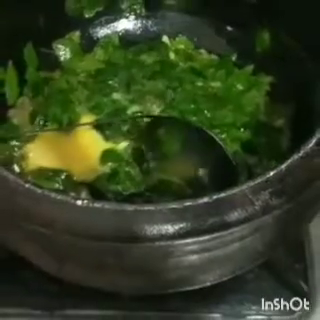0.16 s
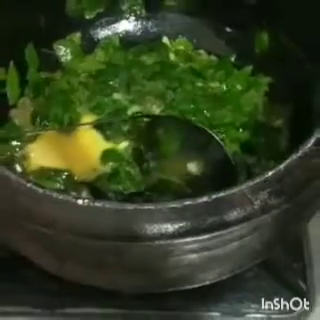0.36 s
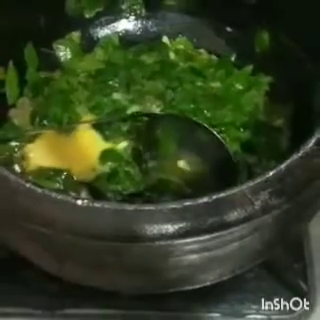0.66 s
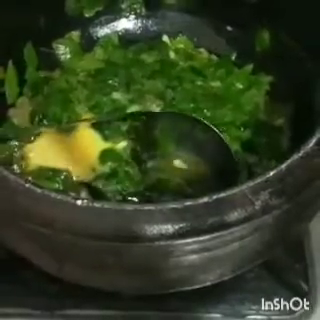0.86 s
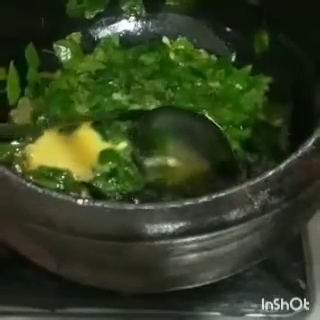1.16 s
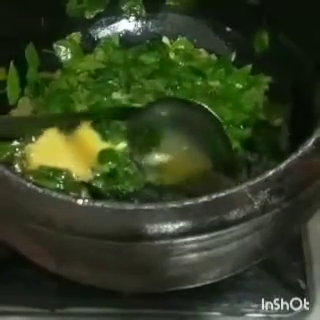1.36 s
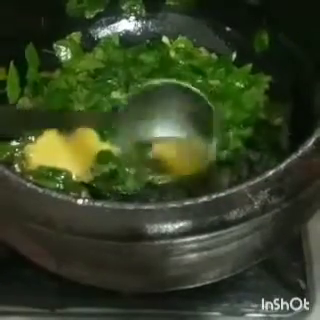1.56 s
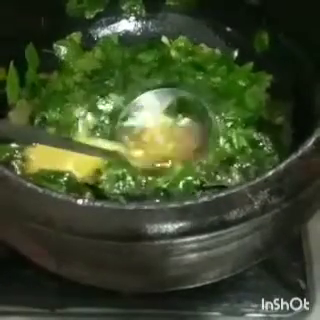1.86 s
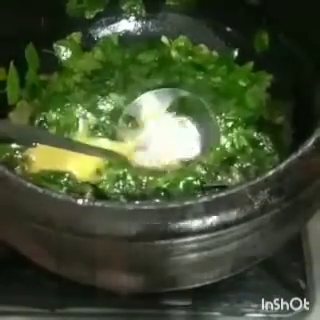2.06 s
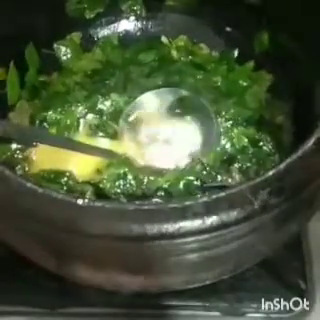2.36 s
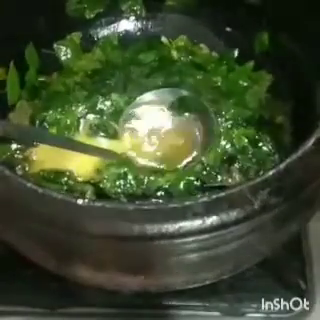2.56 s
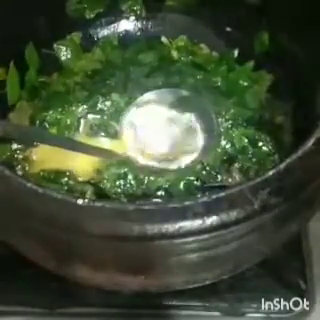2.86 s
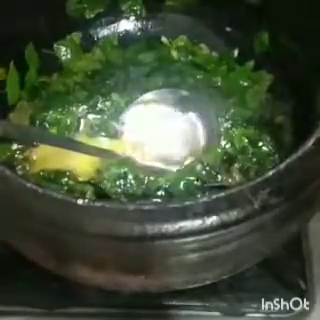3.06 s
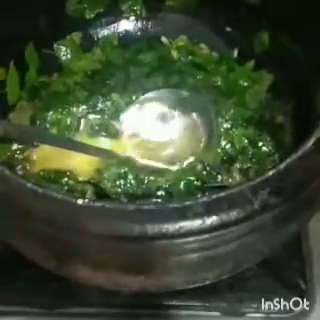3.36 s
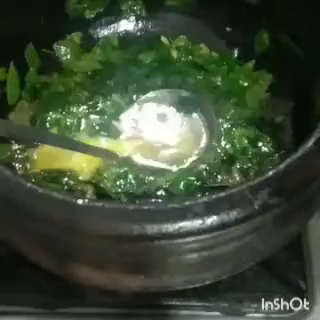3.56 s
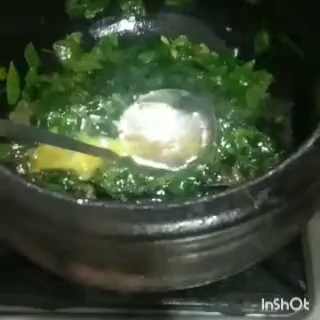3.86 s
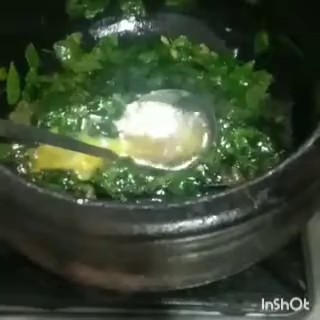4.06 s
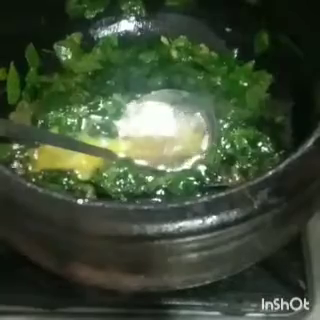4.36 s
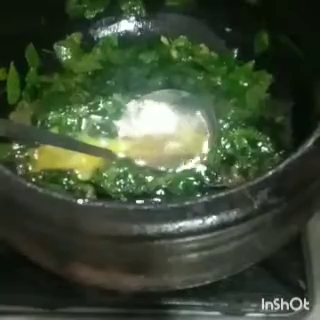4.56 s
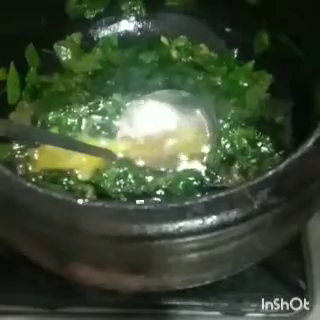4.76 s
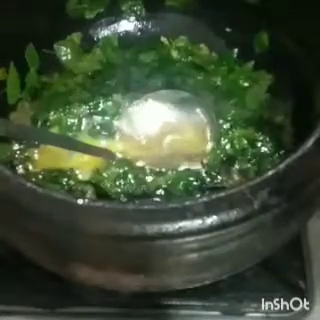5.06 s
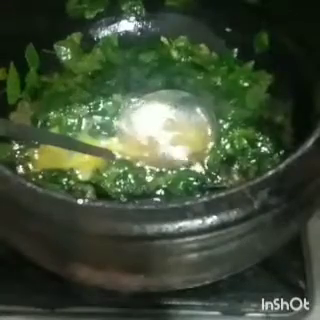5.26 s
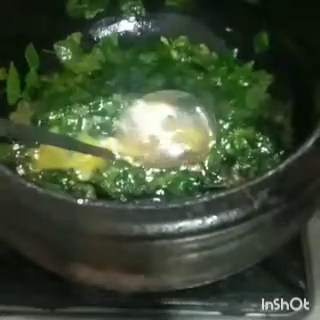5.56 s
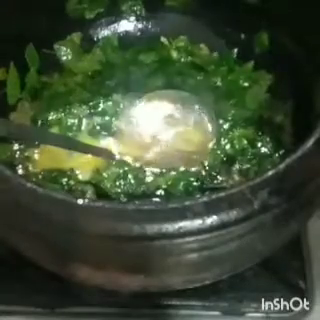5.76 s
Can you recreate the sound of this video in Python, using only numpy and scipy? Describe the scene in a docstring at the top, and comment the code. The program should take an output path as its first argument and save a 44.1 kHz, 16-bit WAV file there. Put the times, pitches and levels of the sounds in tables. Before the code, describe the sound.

Leaves simmer in a clay pot close to the microphone, giving a soft, steady fizz of tiny bubbles for the whole six seconds, with occasional quiet plops. Short wet spits crackle often in the first two seconds, thickest from about 1.6 to 2.1 seconds, then come only now and then. From about 2.3 seconds, utensils knock lightly across the kitchen. At 2.6 seconds a metal ladle is tapped sharply and rings briefly, followed by two weaker taps. Between 3.6 and 3.9 seconds a vessel is set down and rocks, making a quick, prominent ringing rattle. More utensil clacks and thuds on the counter come from 4.4 to 5.5 seconds, strongest near 4.6, 5.2 and 5.5. The walls give each blow a short echo. A faint, very deep rumble swells at about 4.5 seconds and dies away beneath the simmering.

```python
"""In a kitchen, leaves simmer in a clay pot close by: tiny bubbles burst in a steady fizz, with soft plops
and louder spits, coloured by the pot and the microphone. Across the room utensils knock, a metal ladle is
tapped, and a vessel is set down and rocks. The walls draw each blow out into a short tail of echoes.
Near the end a very deep rumble swells and dies away."""
import sys
import numpy as np
from scipy import signal
from scipy.fft import rfft, irfft
from scipy.io import wavfile
from scipy.ndimage import uniform_filter1d

SR = 44100
rng = np.random.default_rng(int(sys.argv[2]) if len(sys.argv) > 2 else 0)


def waveform_to_disk(signal):
    """Save audio, clipped to [-1, 1], as 16-bit WAV at the path in sys.argv[1]."""
    frames = np.transpose(np.atleast_2d(signal))
    scaled = np.clip(frames, -1, 1) * 32767
    samples = np.round(scaled).astype(np.int16)
    wavfile.write(sys.argv[1], SR, samples)


N = 260631
T = np.arange(N) / SR  # time in seconds
TAIL_SAMPLES = int(0.5 * SR)  # length of one blow's ring
CLACK, THUD, BODY, TICK = range(4)  # the four pitch ranges of a blow


def undb(db):
    return 10 ** (np.asarray(db) / 20)


def unit(x):
    return x / np.sqrt(np.mean(x ** 2))


def peak(x):
    return x / np.abs(x).max()


def band(x, low_hz, high_hz):
    return signal.sosfilt(signal.butter(3, [low_hz, high_hz], "bandpass", fs=SR, output="sos"), x)


def fade(fade_s, size=TAIL_SAMPLES):
    """A smooth decay that drops 60 dB in fade_s seconds."""
    return np.exp(-np.log(1000) * T[:size] / fade_s)


def through(x, response):
    return signal.fftconvolve(x, response)[:N]


def add(out, start_s, sound):
    i = int(start_s * SR)
    out[i:i + len(sound)] += sound[:len(out) - i]


def tone_filter(db_at_hz, size=4096):
    """A filter with the given gain at each pitch; it rings only after a sound, never before."""
    hz = np.maximum(np.arange(size // 2 + 1) * SR / size, 10)
    cepstrum = irfft(db_at_hz(hz) * np.log(10) / 20)
    cepstrum[1:size // 2] *= 2
    cepstrum[size // 2 + 1:] = 0
    return irfft(np.exp(rfft(cepstrum)))


def wander(steps_per_s):
    """A value that drifts smoothly from one random level to the next."""
    hold = int(SR / steps_per_s)
    steps = np.repeat(rng.standard_normal(N // hold + 1), hold)
    return 1.3 * uniform_filter1d(uniform_filter1d(steps, hold), hold)[:N]


def pot_and_microphone_db(hz):
    """The pot's resonance and the microphone together lift some pitches and weaken others."""
    # peaks and dips: pitch_hz, width_hz, gain_db
    bumps = [(56.3, 16, -29.5), (262, 28, -12.5), (747.6, 270, 15), (1260, 400, -7), (1434, 120, 1.5),
             (2100, 105, 7), (2770, 23, 2), (3447, 360, 5), (3940, 355, -6.5), (6917, 900, 12.5),
             (8190, 200, 8), (11100, 5070, -10), (15500, 620, 17)]
    return sum(db / (1 + (2 * (hz - centre) / width) ** 2) for centre, width, db in bumps)


def fizz():
    """Bubbles of each size burst at random over a smooth hiss; all surge as the boil wavers."""
    # course of the simmer: time_s, level_db, murmur_boost_db, treble_boost_db
    simmer = [(0.0, -54.5, 5, 0), (0.45, -56.5, 4, 1), (1.42, -55, 4.5, 0.5), (1.75, -53, 2, 1),
              (2.05, -56.5, 1, 4), (2.25, -56, 1.5, 1), (2.76, -53.5, -2.5, -0.5), (3.33, -58, 0.5, -1),
              (5.9, -57, 3, 0)]
    # tone of the fizz: pitch_hz, gain_db
    spectrum = [(15, -11.5), (25, 1.5), (154, -14.5), (280, -21.5), (706, -10), (1150, -16), (1430, -7),
                (2090, -13.5), (2460, -14), (3410, -15), (4020, -17.5), (6920, -20), (10100, -21),
                (15200, -17), (16500, -48.5)]
    # borders between bubble sizes, large to small: pitch_hz
    edges = [15, 90, 500, 1150, 2600, 4100, 5900, 9000, 13000, 20000]
    bubbles_per_s, spread_db = 500, 8.5  # for each size
    times, level_db, murmur_db, treble_db = np.transpose(simmer)
    pitch_hz, gain_db = np.transpose(spectrum)
    colour = tone_filter(lambda hz: np.interp(np.log(hz), np.log(pitch_hz), gain_db))
    bubbles, surge = 0, wander(12)
    for low_hz, high_hz in zip(edges, edges[1:]):
        strength = undb(spread_db * np.minimum(rng.exponential(size=N), 4.5))
        bursts = through((rng.random(N) < bubbles_per_s / SR) * strength, fade(0.0096, 600))
        flicker = undb(0.83 * surge + 1.57 * wander(22.223))
        loudness = (unit(bursts) + 2.35) * flicker  # the constant is the smooth hiss
        bubbles = bubbles + band(loudness * rng.standard_normal(N), low_hz, high_hz)
    sound = through(bubbles, colour)
    sound /= np.sqrt(np.mean(band(sound, 930, 8900) ** 2))
    murmur = band(sound, 494, 835) * (undb(np.interp(T, times, murmur_db)) - 1)
    treble = band(sound, 11000, 16600) * (undb(np.interp(T, times, treble_db)) - 1)
    return (sound + murmur + treble) * undb(np.interp(T, times, level_db))


def plops():
    """Each big bubble makes a short, soft, falling low tone with a slosh."""
    # big bubbles: start_s, level_db, pitch_hz
    bubbles = [(0.052, -54, 221), (0.109, -58.5, 193), (0.641, -54.5, 97), (1.012, -55, 186),
               (2.272, -59.5, 200), (2.393, -59, 212), (2.51, -59.5, 217), (4.986, -50, 471)]
    out, t = np.zeros(N), T[:5000]
    swell = peak(t * np.exp(-t / 0.017))
    for start_s, level_db, pitch_hz in bubbles:
        tone = np.sin(2 * np.pi * pitch_hz * t * (1 - 2.73 * t))
        slosh = unit(band(rng.standard_normal(len(t)), 49, 640))
        add(out, start_s, undb(level_db) * swell * (tone + slosh))
    return out


def spits():
    """Each spit is a very short crack with a wet hiss after it; small ones come by chance."""
    # louder spits and dry ticks at the pot: start_s, level_db, body_db, treble_db
    loud_spits = [(0.2174, -34.5, -62, -39), (0.2932, -46, -80, -38), (0.431, -28.5, -40, -36),
                  (0.440, -30.5, -60, -33), (0.7412, -40, -71, -39), (0.8515, -34.5, -49, -26),
                  (0.9173, -32.5, -50, -42), (1.0196, -31.5, -63, -34), (1.0799, -40, -64, -44),
                  (1.2391, -40, -55, -40), (1.282, -41.5, -50, -37), (1.5309, -58, -51.5, -43),
                  (1.6013, -41, -48, -44), (1.6402, -37, -67, -30), (1.6856, -27, -50, -38),
                  (1.7509, -35.5, -58, -27), (1.7984, -35.5, -51, -28), (1.8287, -37, -70, -38),
                  (1.8976, -39, -62, -34), (1.9245, -44, -77, -31), (1.9884, -37, -55, -47.5),
                  (2.0113, -34, -58, -33), (2.0308, -31, -83, -28), (2.0792, -42, -62, -37),
                  (3.0355, -53, -58, -56.5), (3.2495, -37, -67, -42), (4.0781, -37.5, -65, -57.5),
                  (4.3555, -34.5, -56, -41), (4.8648, -40.5, -55, -46.5), (5.1726, -37, -59, -55.5),
                  (5.664, -38, -59, -41)]
    small_db, spread_db = (-44, -60, -50), (2.5, 5, 5)  # level, body, treble
    stir_s = (1.62, 2.12)  # extra small spits while the ladle turns
    starts = np.append(rng.uniform(0, T[-1], 16), rng.uniform(*stir_s, 14))
    small_spits = np.column_stack([starts, small_db + spread_db * rng.standard_normal((len(starts), 3))])
    crack, hiss = fade(0.0013, 3500), undb(-14) * fade(0.07, 3500)
    out = np.zeros(N)
    for start_s, level_db, body_db, treble_db in [*loud_spits, *small_spits]:
        burst = rng.standard_normal(3500) * (crack + hiss)
        parts = [(1160, 6600, level_db), (1270, 3980, level_db - 6.5),
                 (613, 808, body_db), (10740, 15500, treble_db)]
        add(out, start_s, sum(undb(db) * peak(band(burst, low, high)) for low, high, db in parts))
    return out


def blow(part, crack_db=0.):
    """One pitch range of a blow: a crack, then the scattered echoes of the kitchen."""
    # ranges of clack, thud, body and tick: low_hz, high_hz
    ranges = [(1090, 3480), (126, 300), (360, 940), (4200, 12900)]
    # echo length in each range: fade_s
    echo_s = [0.3, 0.37, 0.4, 0.27]
    # echo strength in each range: level_db
    echo_db = [7, 19.5, -8, -2.5]
    loudness = undb(crack_db) * fade(0.013) + undb(echo_db[part]) * fade(echo_s[part])
    return peak(band(rng.standard_normal(len(loudness)) * loudness, *ranges[part]))


def ring(notes, scatter_db, rise_s):
    """A struck object rings its own notes, in a new mix each time; a softer touch swells more slowly."""
    chance = rng.standard_normal((len(notes), 3))
    sound, t = 0, T[:TAIL_SAMPLES]
    for (pitch_hz, level_db, fade_s), (scatter, detune, phase) in zip(notes, chance):
        tone = np.sin(2 * np.pi * (pitch_hz * (1 + 0.0021 * detune) * t + phase))
        sound = sound + undb(level_db + scatter_db * scatter) * fade(fade_s) * tone
    return peak(sound * (1 - np.exp(-t / rise_s)) ** 2)


def knocks():
    """Utensils knock, each with its own note."""
    # knocks: start_s, clack_db, pitch_hz, thud_db, body_db, tick_db, flicker_db
    hits = [(2.278, -42, 1860, -72, -56, -43, -35), (2.403, -43, 2210, -57, -64, -60, -27),
            (2.521, -40, 2530, -45, -51, -44, -35), (2.699, -34, 1980, -57, -40, -39.5, -41),
            (4.438, -36, 3200, -53.5, -33.5, -78, -39), (4.459, -49, 3170, -45, -39, -52, -33),
            (4.578, -26.5, 3100, -27.5, -31, -19, -30), (4.802, -32.5, 2000, -45.5, -34, -47.5, -35),
            (4.988, -72, 2110, -69, -42.5, -74, -28), (5.054, -68, 2100, -55, -42, -73, -26),
            (5.207, -37, 1760, -42.5, -58, -43, 10), (5.225, -22, 1960, -37, -27.5, -28.5, 2),
            (5.243, -46, 2095, -78, -27.5, -31, -1), (5.453, -27.5, 1840, -35, -36, -25.5, 5),
            (5.465, -19, 2270, -35, -27, -18.5, -4.5), (5.524, -59, 2180, -55, -40, -28, -40)]
    # notes of the counter boards that the thuds shake: pitch_hz, level_db, fade_s
    board_notes = [(94, 10, 0.53), (162.2, 8.5, 0.48), (177.6, 1.5, 0.25), (180, -2, 0.14)]
    mid, stereo_flicker = np.zeros(N), np.zeros(N)
    for start_s, clack_db, pitch_hz, thud_db, body_db, tick_db, flicker_db in hits:
        crack_db = 2.5 + 0.1 * (tick_db - thud_db - 17.5)  # brighter knocks crack harder
        clack = blow(CLACK, crack_db)
        clack += undb(-6.5) * peak(band(blow(CLACK), pitch_hz / 1.21, pitch_hz * 1.058))
        boards_db = -0.5 + max(2 * (thud_db + 28), -13)  # lighter thuds ring the boards less
        boards = undb(boards_db) * ring(board_notes, scatter_db=1.8, rise_s=0.002)
        thud = boards + undb(-1) * blow(THUD, crack_db=27.3)
        plain_tick = blow(TICK, crack_db)
        metal_ring = rng.standard_normal(900) * fade(0.008, 900)  # this utensil's uneven treble
        tick = peak(through(plain_tick, metal_ring))
        body = blow(BODY, crack_db)
        add(mid, start_s, undb(clack_db) * clack + undb(thud_db) * thud + undb(body_db) * body)
        add(mid, start_s, undb(tick_db) * tick)
        # a brief stereo flicker, as from audio compression
        flicker = (undb(clack_db - 9) * blow(CLACK) + undb(body_db - 17) * blow(BODY)
                   + undb(thud_db - 8) * blow(THUD) + undb(tick_db) * blow(TICK))
        add(stereo_flicker, start_s, undb(flicker_db) * fade(0.11) * flicker)
    return mid, stereo_flicker


def ladle():
    """A tapped metal ladle rings briefly over a low thump; the kitchen's echoes roughen its notes."""
    # taps and the range that rings: start_s, level_db, low_hz, high_hz
    taps = [(2.625, -16.5, 600, 3130), (2.853, -32, 1440, 2140), (2.974, -47, 2220, 2650)]
    # notes of the ladle: pitch_hz, level_db, fade_s
    notes = [(833, -4, 0.28), (990, -33, 0.27), (1390, -8, 0.32), (1700, -10, 0.37), (1924, -3, 0.1),
             (2290, -5, .3), (2250, -31, 0.22), (2630, -11.5, 0.2), (2630, -14, 0.25), (3210, -12, 0.19)]
    out = np.zeros(N)
    for start_s, level_db, low_hz, high_hz in taps:
        metal = ring(notes, scatter_db=2.5, rise_s=0.0003)
        room = rng.standard_normal(TAIL_SAMPLES) * fade(0.27)
        echoes = peak(through(metal * fade(0.021), room))[:TAIL_SAMPLES]
        tap = undb(-3.5) * metal + echoes + undb(-0.5) * blow(CLACK, crack_db=12)
        thump = blow(BODY, crack_db=5.7) + undb(-10) * blow(THUD, crack_db=26)
        add(out, start_s, undb(level_db) * peak(band(tap, low_hz, high_hz)))
        add(out, start_s, undb(level_db - 23.5) * peak(band(thump, 224, 690)))
    return out


def rocking_vessel():
    """Each touch on the counter rings the same notes, with a low knock and a dull clack."""
    # touches as the vessel is set down and rocks: start_s, ring_db, knock_db
    touches = [(3.584, -19, -21), (3.606, -15, -42), (3.647, -17.5, -22), (3.672, -15, -40),
               (3.698, -19.5, -52), (3.726, -22, -42), (3.775, -21, -30), (3.8, -16.5, -26.5),
               (3.827, -22, -25.5), (3.839, -21.5, -34.5), (3.852, -18, -35)]
    # notes of the vessel: pitch_hz, level_db, fade_s
    notes = [(323, -25.5, 0.61), (428.8, -21.5, 0.41), (545, -20.5, 0.5), (727.2, -12, 0.47),
             (773.8, -1, 0.56), (850.7, -7.5, 0.33), (863, -23, 0.28), (896, -20, 0.35),
             (1113, -26.5, 0.35), (2056, -32.5, .3), (2600, -35.5, 0.51), (3280, -30.5, 0.11)]
    pressure = undb(-4.5) + fade(0.083)  # it rings most while it bears down
    out = np.zeros(N)
    for start_s, ring_db, knock_db in touches:
        ringing = ring(notes, scatter_db=1.4, rise_s=0.00074) * pressure
        ringing += undb(-8.5) * band(blow(BODY), 686, 970)
        knock = band(blow(BODY), 280, 570) + undb(-21.5) * peak(band(blow(BODY) + blow(THUD), 50, 136))
        clack = (band(blow(CLACK), 1620, 2770) + undb(-5.5) * band(blow(CLACK), 3170, 4000)
                 + undb(-5) * band(blow(TICK), 3600, 7000))
        add(out, start_s, undb(ring_db) * ringing + undb(knock_db) * (knock + undb(-6.5) * clack))
    return out


def rumble(start_s=4.52, rise_s=0.04, hold_s=0.29, fade_s=2, level_db=-50):
    """A rumble at the bottom of hearing swells, holds and dies away."""
    t = T - start_s
    loudness = np.clip(t / rise_s, 0, 1) * undb(-60 * np.maximum(t - hold_s, 0) / fade_s)
    return unit(band(rng.standard_normal(N), 21.3, 36)) * undb(level_db) * loudness


def scene():
    """The pot's resonance and the microphone together colour the simmer and the knocks."""
    mid, stereo_flicker = knocks()
    colour = tone_filter(pot_and_microphone_db)
    mid = through(mid + fizz() + spits() + plops(), colour) + rocking_vessel() + ladle() + rumble()
    stereo_flicker = through(stereo_flicker, colour)
    return np.array([mid + stereo_flicker, mid - stereo_flicker])


def record(dry):
    """A phone beside the pot cuts off the highest treble steeply."""
    cutoff_hz = 15780
    return signal.sosfilt(signal.ellip(10, .2, 50, cutoff_hz, fs=SR, output="sos"), dry)


dry = scene()
out = record(dry)
waveform_to_disk(out)
```